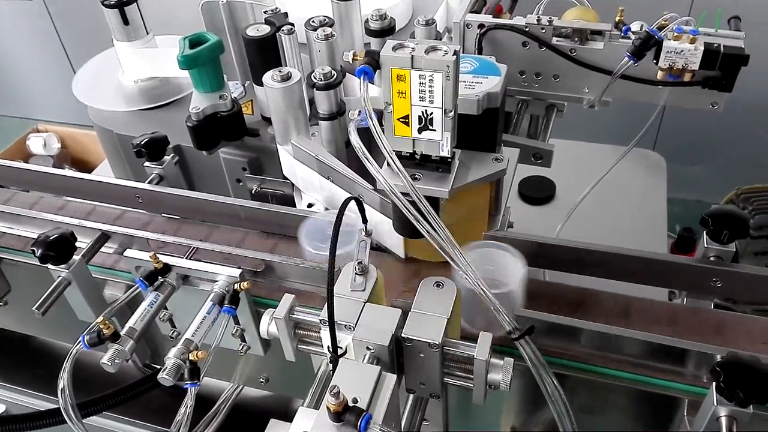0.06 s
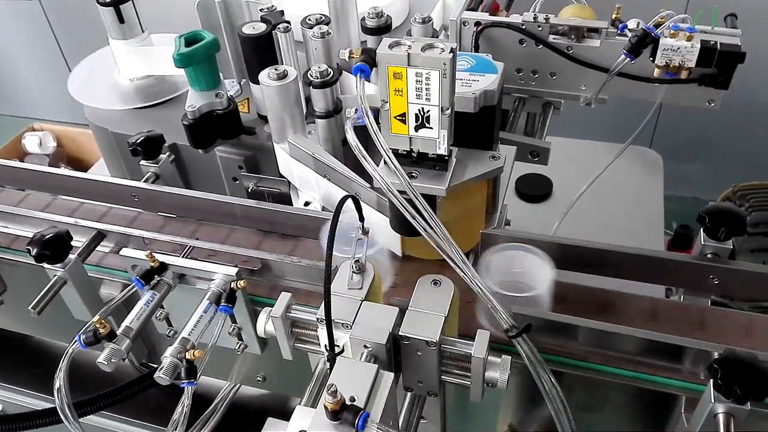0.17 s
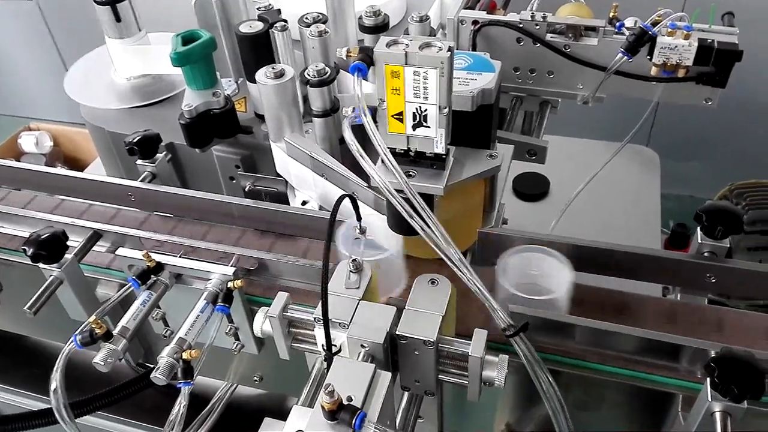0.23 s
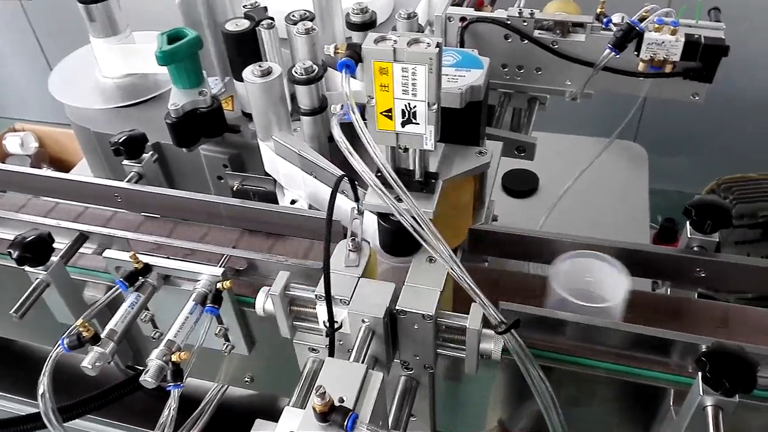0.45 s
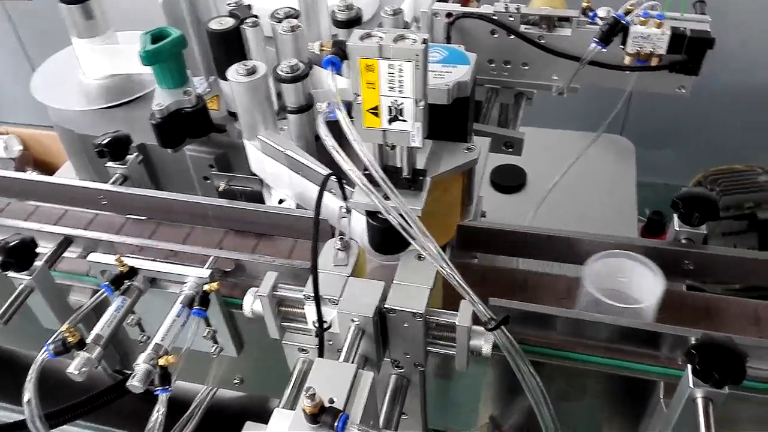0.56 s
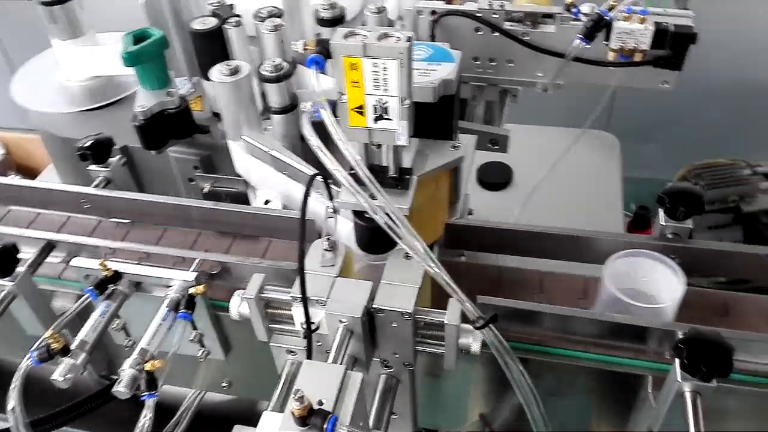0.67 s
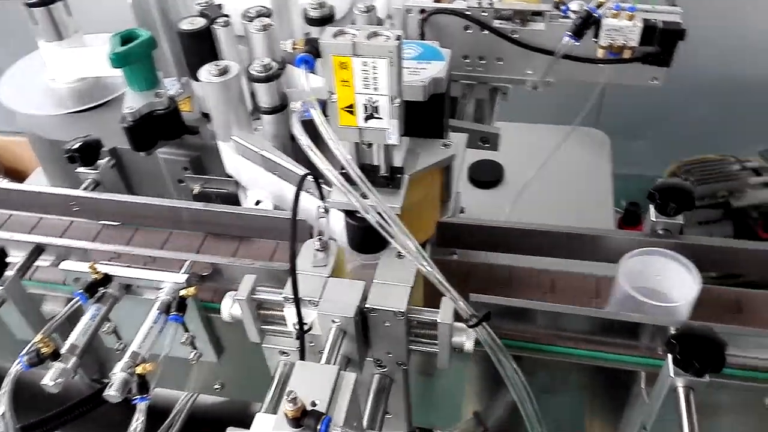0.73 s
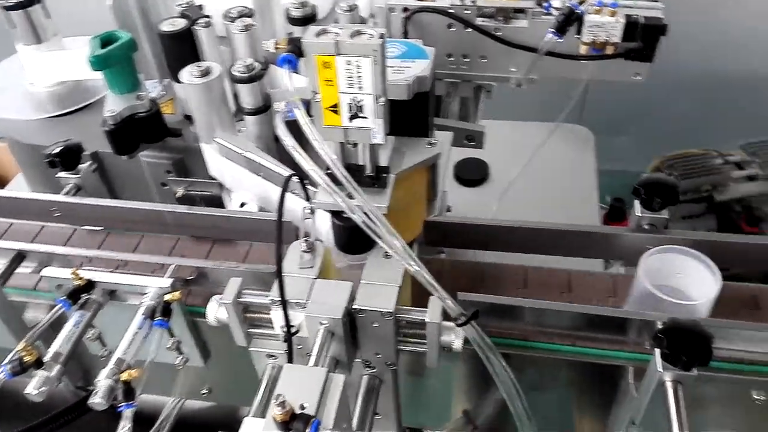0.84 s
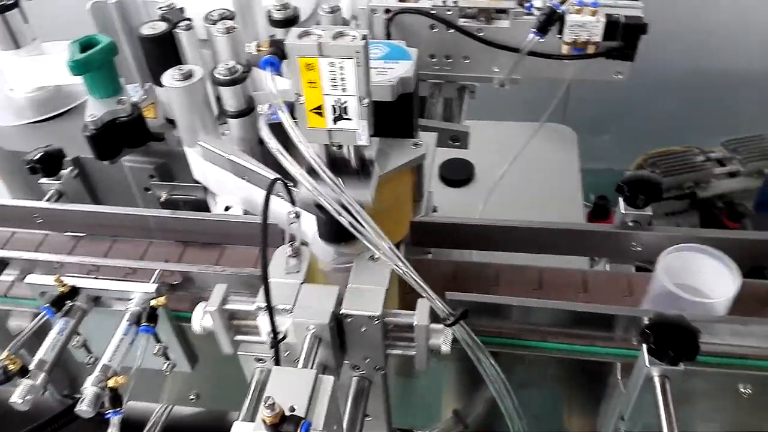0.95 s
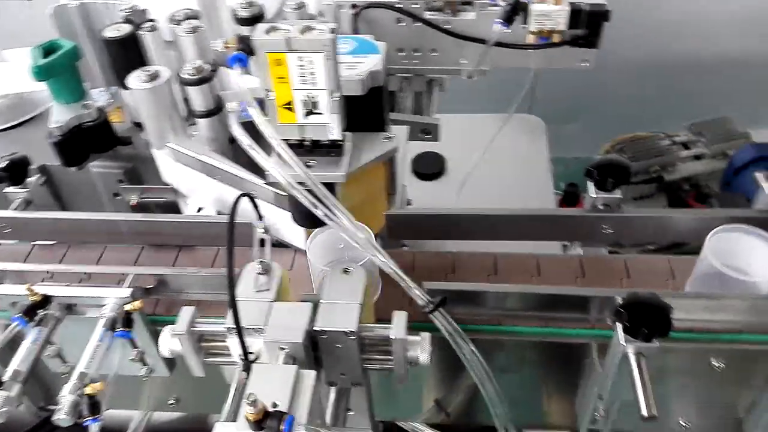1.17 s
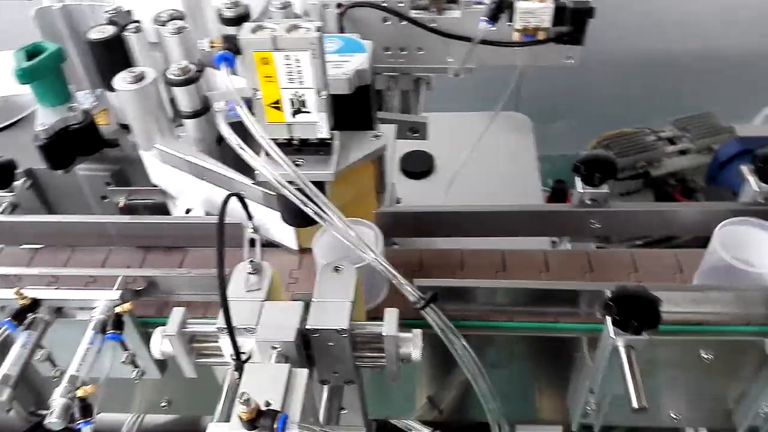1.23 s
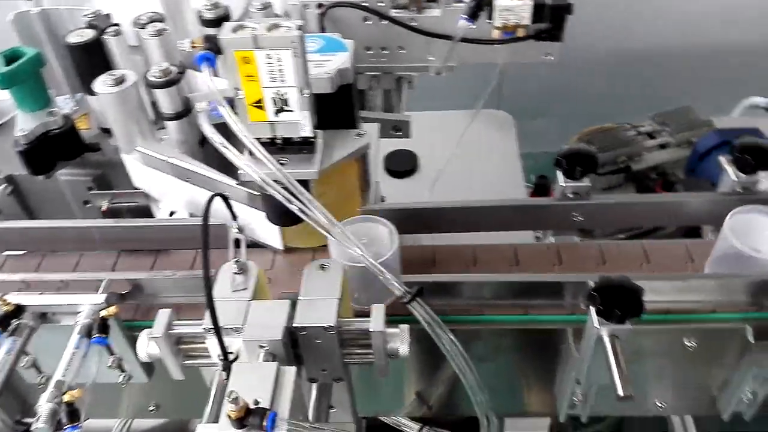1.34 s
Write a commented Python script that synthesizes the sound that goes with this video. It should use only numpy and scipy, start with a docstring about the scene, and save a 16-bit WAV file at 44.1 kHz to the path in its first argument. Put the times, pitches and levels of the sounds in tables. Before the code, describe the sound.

Sharp metal clacks and short air hisses come from a labeling machine, followed by a brief label crackle and a few lighter knocks. Its conveyor hums steadily in a slightly reverberant workshop, and the right microphone sounds more muffled.

```python
"""In a workshop, an automatic labeling machine handles one plastic jar.
Air cylinders hiss and clack against their stops; the impacts excite the damped modes of steel
brackets and frame, and reverberate. A slide thuds, the feed motor whines and the label crackles
as it is pressed on. Motors and conveyor hum throughout. The right microphone faces away and
hears it all later and duller."""
import sys
import numpy as np
from scipy import signal
from scipy.fft import rfft, irfft
from scipy.io import wavfile

SR = 44100
rng = np.random.default_rng(int(sys.argv[2]) if len(sys.argv) > 2 else 0)


def transcribe(u):
    """Save the signal u as a 16-bit wav file named by the first command-line argument.

    u: samples, shape (n,) or (channels, n), limited to [-1, 1]; the rate is SR.
    q: integer samples, one column per channel.
    """
    v = np.clip(np.atleast_2d(u).T, -1, 1)
    q = np.round(v * 32767).astype(np.int16)
    wavfile.write(sys.argv[1], SR, q)


N = 61739
T = np.arange(N) / SR
HZ = np.maximum(np.arange(N // 2 + 1) * SR / N, 1)

# Levels in the tables are relative.
# metal parts hitting their stops: start_s, body_db, clatter_db, edge_db, t60_s, rise_s
IMPACTS = [(0.197, -30, -32.5, -48.5, 0.18, 0.0038), (0.2666, -15.5, -11.5, -15.5, 0.073, .001),
           (.302, -20.5, -18.5, -20, 0.051, 0.0074), (.3835, -9, -8.5, -1.5, 0.027, 0.00044),
           (0.3976, -9, -16, -5, .055, 0.00096), (0.441, -29, -30, -34, 0.037, .003),
           (.4636, -44.5, -26, -17.5, .03, .001), (.5075, -25, -22, -16, 0.027, 0.00059),
           (0.512, -19, -24, -21, 0.1, 0.0044), (0.6835, -25, -30.5, -18.5, 0.12, 0.00076),
           (0.712, -32, -35, -35.5, .1, 0.0066), (0.729, -21.5, -27.5, -20, .03, 0.0077),
           (0.874, -32.5, -31, -22.5, .04, 0.0014), (1.011, -18, -24.5, -22.5, 0.057, .004),
           (1.1129, -21.5, -22.5, -21, 0.054, .002), (1.119, -27, -32, -34, 0.038, 0.0017),
           (1.171, -29.5, -49, -31, 0.031, 0.00238), (1.25, -37.5, -42, -33.5, 0.066, 0.00073)]
# body, clatter and edge bands of an impact: low_hz, high_hz
IMPACT_BANDS = [(480, 1520), (1600, 3370), (4200, 7440)]
# modes of the steel brackets: pitch_hz, level_db, t60_s
BRACKET_MODES = [(813, -11, 0.11), (984.5, -4, 0.12), (1164, -2, 0.04), (1361, -6, 0.083),
                 (1565, -16.5, 0.42), (1816, -12, 0.23), (2480, -16, 0.3), (2820, -7, .12),
                 (2910, -16.5, 0.29), (3650, -23, 0.32), (4676, -8.5, 0.07), (4540, -11.5, 0.14),
                 (4670, -26, 0.052), (5353, -28, 0.22)]
# blows that reach the frame: start_s, level_db, pitch_ratio
FRAME_BLOWS = [(0.3829, -13.5, 1.08), (.397, -9, 1.0), (1.0128, -14, 1.085), (1.113, -20.5, 1.09),
               (1.168, -32.5, 1.04)]
# modes of the frame: pitch_hz, level_db, t60_s, rise_s
FRAME_MODES = [(214.2, -13, 0.16, .026), (266.6, -9.5, .07, 0.036), (314.5, 1, .15, 0.0071),
               (402.6, -6, 0.14, 0.0022), (431, -7, 0.11, 0.0046), (483.7, -6.5, 0.076, 0.0013),
               (582, -15.5, 0.16, 0.0012)]
# rattle of loose panels: frequency_hz, level_db
PANEL_SPECTRUM = [(150, -47), (250, -19.5), (330, -13.5), (480, -8.5), (700, -35), (2000, -56)]
# notes of small parts: start_s, pitch_hz, level_db, t60_s
PART_TAPS = [(.464, 4730, -9, .02), (0.4647, 4363, -10, 0.0173), (.508, 801, -4.5, 0.033),
             (0.507, 952, -11, 0.035), (.509, 690, -13.5, 0.024)]
# jolts of the slide: start_s, pitch_hz, level_db
SLIDE_THUDS = [(.193, 80, -21.5), (0.27, 92, -21), (0.427, 77.5, -29.5), (0.514, 70, -26.5),
               (0.862, 80.5, -20), (0.888, 100.5, -28), (1.012, 104, -31.5)]
# snaps of the label: start_s, level_db
LABEL_SNAPS = [(0.732, -12), (0.746, -13), (0.76, -14), (.778, -16), (0.784, -12), (0.793, -16.5),
               (0.802, -21), (0.8157, -24)]
# modes of the stiff label film: pitch_hz, level_db, t60_s
FILM_MODES = [(2900, -19, 0.0024), (4300, -13, 0.0052), (5310, 1.5, 0.0057)]
# air venting from the valves: start_s, length_s, level_db
VALVE_PUFFS = [(0.189, 0.13, -28.5), (0.455, 0.069, -27), (0.585, 0.17, -39), (0.666, 0.053, -29),
               (0.856, 0.044, -23.5), (0.928, 0.089, -31.5)]
# hiss of the air: frequency_hz, level_db
AIR_SPECTRUM = [(200, -5.5), (900, -1.5), (2000, -19), (3200, 2), (4300, -3), (5300, 7), (6200, 0)]
# runs of the label feed motor: start_s, length_s, pitch_hz, level_db
FEED_RUNS = [(-.02, 0.093, 5096, -38), (0.187, 0.037, 5530, -34.5), (0.551, .11, 5230, -41)]
# running noise of motors and conveyor: frequency_hz, level_db
RUNNING_SPECTRUM = [(25, -6.5), (55, -2.5), (100, -6.5), (150, -7.5), (210, -1), (300, -1.5), (450, 1.5),
                    (600, -3.5), (1000, -4), (1500, -7), (2200, -9), (3500, -14.5), (5200, -10.5),
                    (6200, -12.5)]
# course of that noise: time_s, level_db
RUNNING_ENVELOPE = [(0, -34.5), (.17, -34), (.3, -26.5), (.58, -28.5), (.75, -30.5), (.83, -32), (.95, -32),
                    (1.2, -33.5), (1.4, -34.5)]
# motor hum: pitch_hz, level_db
HUM_LINES = [(101, -57.5), (204, -47.5), (1200, -56.5), (1394, -53.5), (1658, -56)]
# reverberation: frequency_hz, level_db
ROOM_SPECTRUM = [(100, -15.5), (320, -9.5), (500, 7), (1000, -4), (2500, -1.5), (5000, -5.5)]
# likeness of left and right: frequency_hz, correlation
COHERENCE = [(100, 1), (500, 0.88), (1100, 1), (2200, 0.9), (5000, 0.57)]
# shading of the far microphone: frequency_hz, gain_db
FAR_SHADING = [(300, -0.5), (750, -2), (1300, -3.5), (2300, 0.5), (4500, -1)]

CLACK_HOLD_S, CLACK_DB, BRACKET_DB, BRACKET_SPREAD_DB = 0.001, -2, -5, 2
PANEL_DB, FRAME_LOW_HZ = -13.5, 185.2
WHINE_FADE_S, WHINE_WOBBLE_HZ, HUM_HALF_WIDTH_HZ = 0.038, 18, 13
ROOM_DB, ROOM_T60_S, ROOM_DELAY_S = -14, 0.53, 0.0064
FAR_LAG_S, FAR_CORNER_HZ, FAR_DB = 0.00054, 367, 2
MIC_TOP_HZ, CUTOFF_HZ = 5600, 16000


def clacks():
    """Impact excitation: a brief contact sets off modes so dense that they decay as bands of noise."""
    out = np.zeros((2, N))
    for band, (low, high) in enumerate(IMPACT_BANDS):
        power = sum((from_db(dbs[band]) * swell(start, rise) * decay(start, t60, rise + CLACK_HOLD_S))**2
                    for start, *dbs, t60, rise in IMPACTS)
        passband = 1 / np.sqrt((1 + (low / HZ) ** 10) * (1 + (HZ / high) ** 10))
        out += from_db(CLACK_DB) * np.sqrt(power) * noise(passband)
    return out


def brackets():
    """Resonance: each bracket mode is a damped oscillator, kicked as each impact peaks."""
    out = np.zeros((2, N))
    starts, *band_dbs, _, rises = np.transpose(IMPACTS)
    peak_samples = ((starts + rises) * SR).astype(int)
    for hz, db, t60 in BRACKET_MODES:
        band = sum(hz > low for low, _ in IMPACT_BANDS[1:])
        scatter_db = rng.normal(0, BRACKET_SPREAD_DB, len(starts))
        kicks = np.zeros(N)
        kicks[peak_samples] = from_db(band_dbs[band] + db + BRACKET_DB + scatter_db)
        radius, angle = np.exp(-np.log(1000) / (t60 * SR)), 2 * np.pi * hz / SR
        feedback = [1, -2 * radius * np.cos(angle), radius ** 2]
        out += rng.choice([-1, 1]) * signal.lfilter([0.5, 0, -0.5], feedback, kicks + 1e-18)
    return out


def frame():
    """Modal superposition: the struck frame rings and its panels rattle, radiating little deep bass."""
    modes = sum(from_db(db + mode_db) * swell(start, rise) * ring(start, hz * ratio, t60, hold=rise)
                for start, db, ratio in FRAME_BLOWS for hz, mode_db, t60, rise in FRAME_MODES)
    shake = sum(from_db(db + PANEL_DB) * swell(start, rise=0.0023) * decay(start, t60=0.12, hold=0.014)
                for start, db, _ in FRAME_BLOWS)
    panels = shake * noise(from_db(spectrum(PANEL_SPECTRUM)))
    return highpass(modes + panels, FRAME_LOW_HZ)


def small_parts():
    """Free vibration: each tapped part sounds one quickly damped mode."""
    notes = sum(from_db(db) * ring(start, hz, t60) for start, hz, db, t60 in PART_TAPS)
    return highpass(notes, corner_hz=450)


def slide():
    """Inertial reaction: the slide starts and stops, shaking the table at a low pitch."""
    return sum(from_db(db) * ring(start, hz, t60=0.065) * swell(start, rise=0.0044)
               for start, hz, db in SLIDE_THUDS)


def label():
    """Impulse response: each snap excites the high, heavily damped modes of the film."""
    return sum(from_db(db + mode_db) * ring(start, hz, t60)
               for start, db in LABEL_SNAPS for hz, mode_db, t60 in FILM_MODES)


def air_valves():
    """Turbulence: venting air hisses in puffs which, being incoherent, add in power."""
    power = sum((from_db(db) * swell(start, rise=0.018) * decay(start, t60=0.27, hold=length)) ** 2
                for start, length, db in VALVE_PUFFS)
    return np.sqrt(power) * noise(from_db(spectrum(AIR_SPECTRUM)))


def feed_motor():
    """Frequency modulation: a thin whine wavers at random while the motor turns."""
    wobble = WHINE_WOBBLE_HZ * noise(1 / (1 + (HZ / 60) ** 2))[0]
    out = np.zeros(N)
    for start, length, hz, db in FEED_RUNS:
        envelope = swell(start, WHINE_FADE_S) * (1 - swell(start + length, WHINE_FADE_S))
        out += from_db(db) * envelope * np.sin(2 * np.pi * np.cumsum(hz + wobble) / SR)
    return out


def motors_and_conveyor():
    """Line and continuous spectra: narrow, unsteady hum lines stand on broad running noise."""
    envelope = from_db(np.interp(T, *np.transpose(RUNNING_ENVELOPE)))
    running = envelope * noise(from_db(spectrum(RUNNING_SPECTRUM)))
    hum = sum(from_db(db) * noise(1 / (1 + ((HZ - hz) / HUM_HALF_WIDTH_HZ) ** 2)) for hz, db in HUM_LINES)
    return running + hum


def workshop(sound):
    """Reverberation: reflections from panels and walls merge into a diffuse, decaying tail."""
    tail = noise(from_db(spectrum(ROOM_SPECTRUM))) * decay(ROOM_DELAY_S, ROOM_T60_S)
    tail /= np.sqrt(np.sum(tail ** 2) / 2)
    return from_db(ROOM_DB) * signal.fftconvolve(sound, tail, axes=1)[:, :N]


def from_db(db):
    """Decibel law: 20 dB is tenfold amplitude."""
    return 10 ** (np.asarray(db) / 20)


def spectrum(points):
    """Interpolation of a table over log frequency."""
    hz, value = np.transpose(points)
    return np.interp(np.log(HZ), np.log(hz), value)


def noise(gain):
    """Partial coherence: shaped stereo noise of rms 1, its two sides most alike in the bass."""
    mid, side = rfft(rng.standard_normal((2, N)))
    alike = np.clip(spectrum(COHERENCE), 0, 1)
    x = irfft(gain * (np.sqrt(1 + alike) * mid + np.sqrt(1 - alike) * side * [[1], [-1]]), N)
    return x / np.sqrt(np.mean(x ** 2))


def swell(start, rise):
    """Linear onset: 0 to 1 in rise seconds."""
    return np.clip((T - start) / rise, 0, 1)


def decay(start, t60, hold=0):
    """Exponential damping: a step to 1, a hold, then a fall of 60 dB every t60 seconds."""
    nepers = np.log(1000) * np.maximum(T - start - hold, 0) / t60
    return (T >= start) * np.exp(-np.minimum(nepers, 40))


def ring(start, hz, t60, hold=0):
    """Damped harmonic motion of one struck mode."""
    return decay(start, t60, hold) * np.sin(2 * np.pi * hz * (T - start))


def highpass(sound, corner_hz):
    """Second-order roll-off: the bass falls 12 dB per octave."""
    return signal.sosfilt(signal.butter(2, corner_hz, "high", fs=SR, output="sos"), sound)


def scene():
    """Superposition: all sources add, and the blows also reverberate."""
    blows = clacks() + brackets() + frame() + small_parts()
    return blows + workshop(blows) + slide() + label() + air_valves() + feed_motor() + motors_and_conveyor()


def record(dry):
    """Delay and shadowing: the far microphone is late and dull; both lose top treble and clip at 1."""
    near, far = dry
    far = np.interp(T - FAR_LAG_S, T, far)
    far = signal.lfilter(*signal.butter(1, FAR_CORNER_HZ, fs=SR), far)
    far = from_db(FAR_DB) * irfft(rfft(far) * from_db(spectrum(FAR_SHADING)), N)
    pair = signal.sosfilt(signal.ellip(10, 0.3, 80, MIC_TOP_HZ, fs=SR, output="sos"), [near, far])
    return signal.sosfilt(signal.butter(12, CUTOFF_HZ, fs=SR, output="sos"), np.clip(pair, -1, 1))


dry = scene()
out = record(dry)
transcribe(out)
```